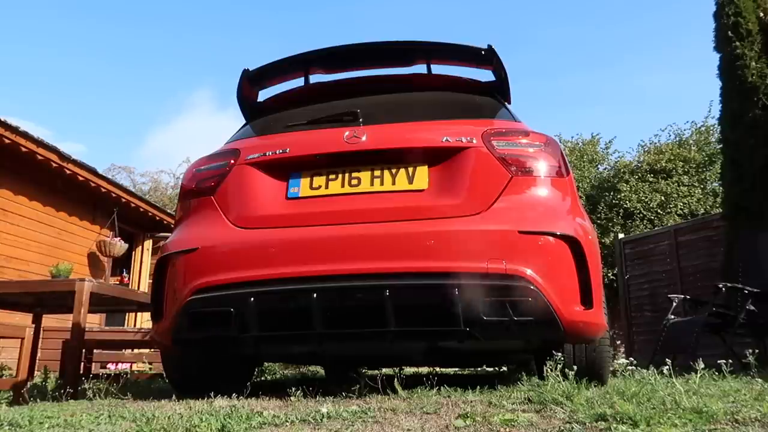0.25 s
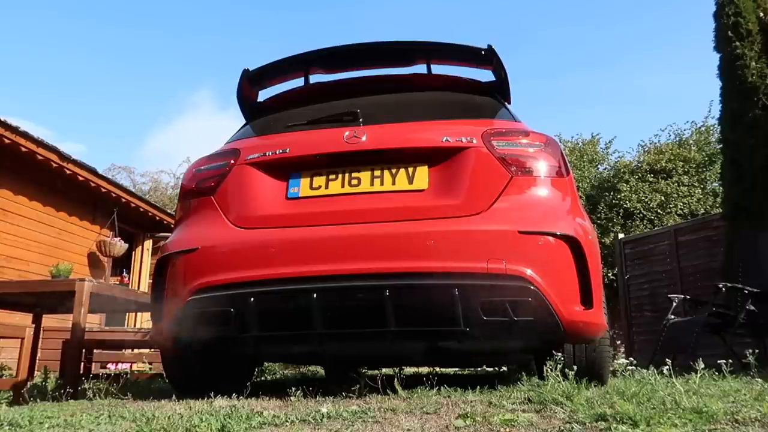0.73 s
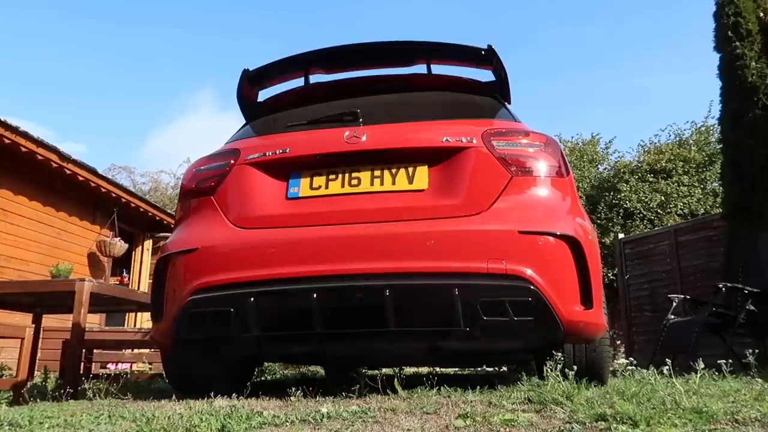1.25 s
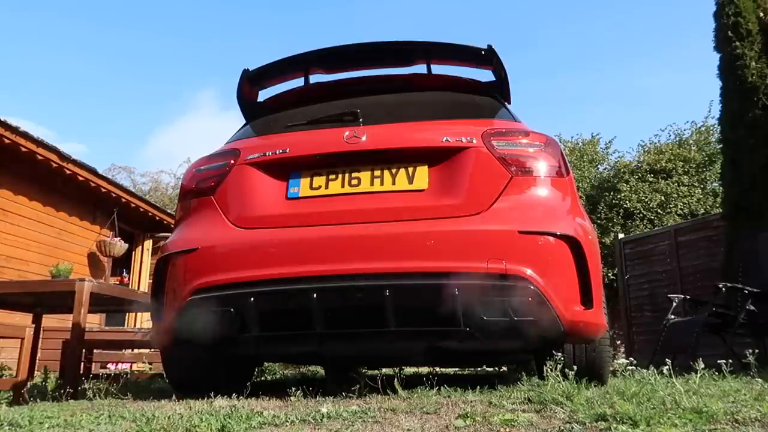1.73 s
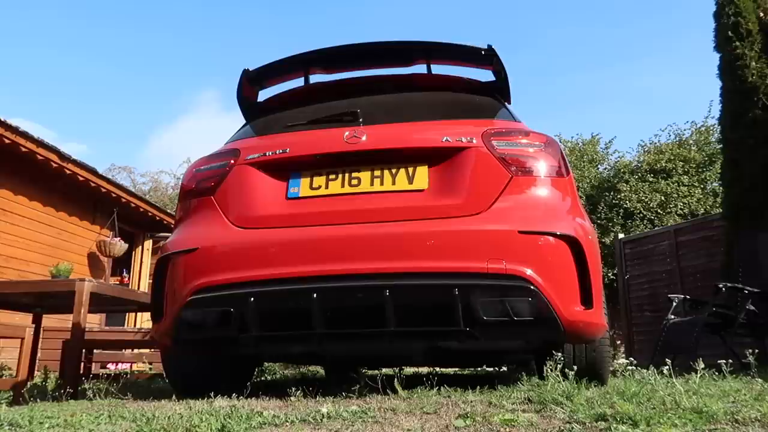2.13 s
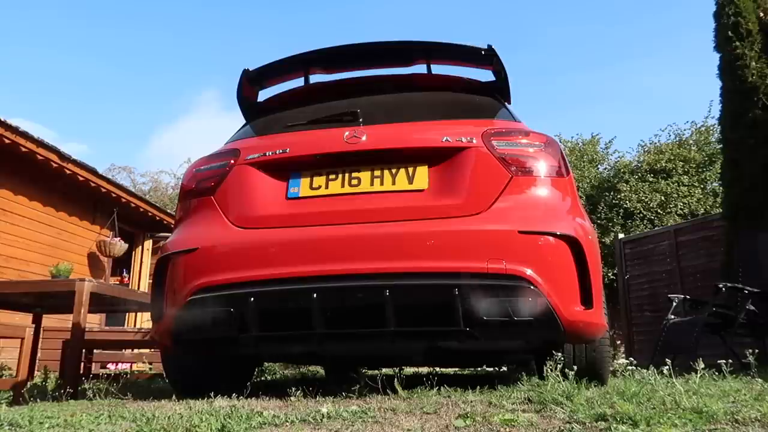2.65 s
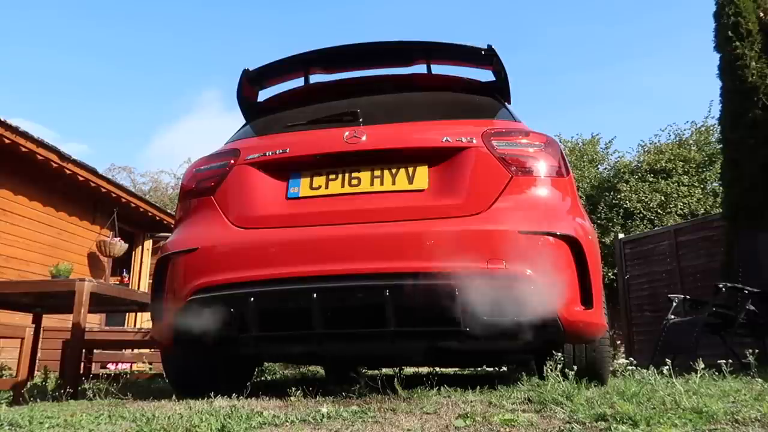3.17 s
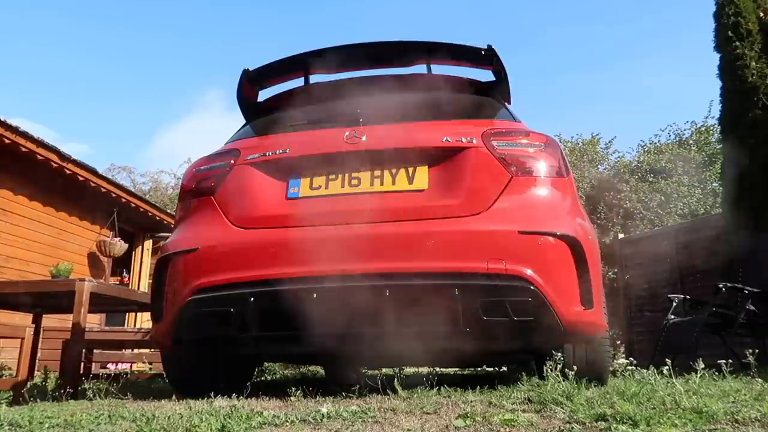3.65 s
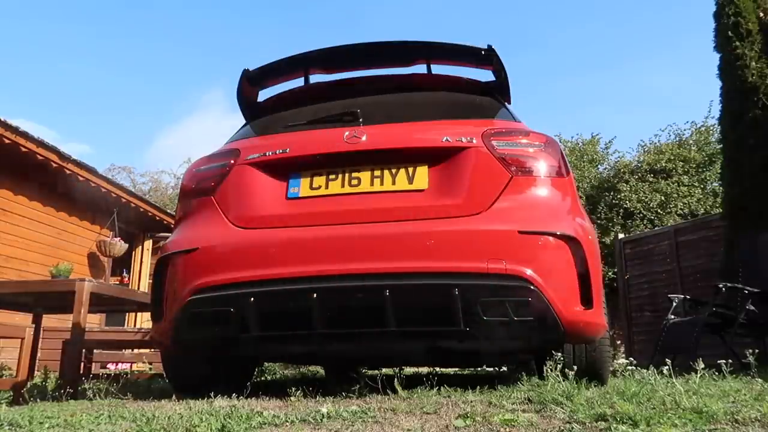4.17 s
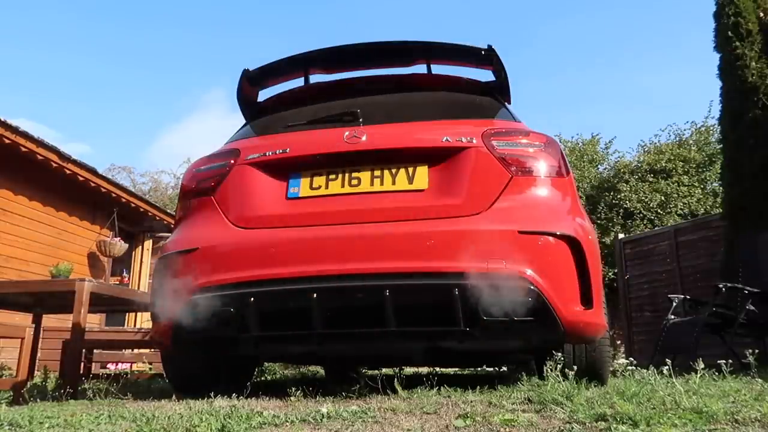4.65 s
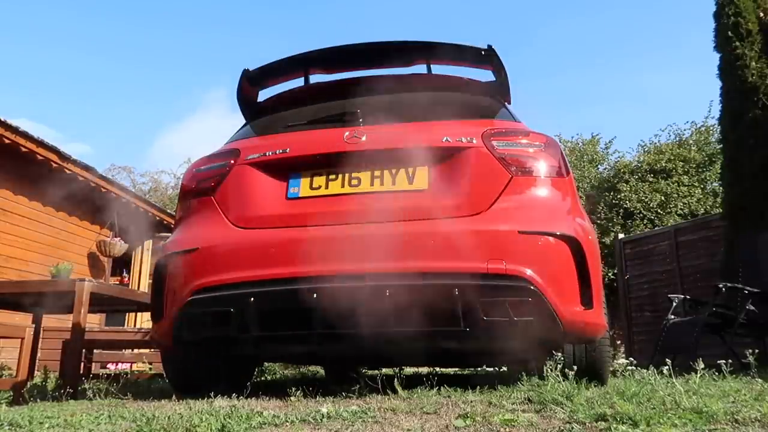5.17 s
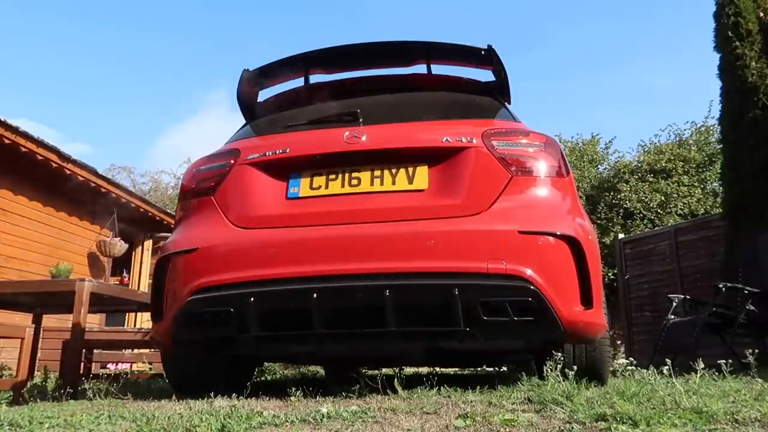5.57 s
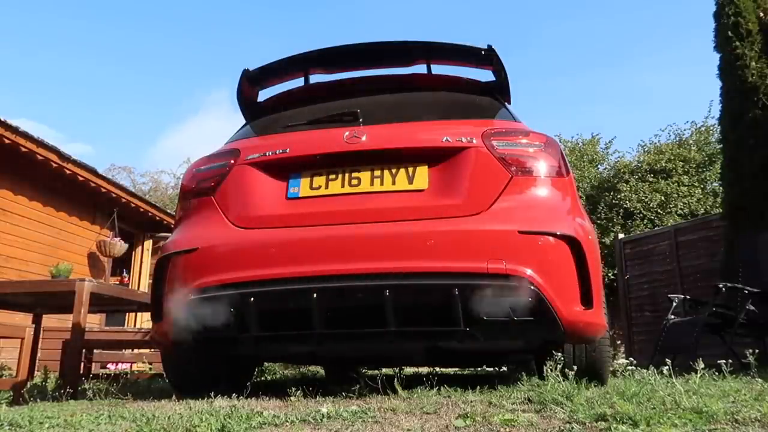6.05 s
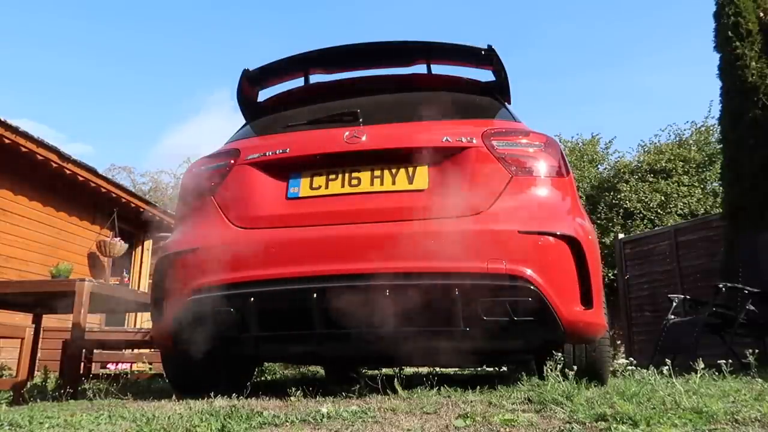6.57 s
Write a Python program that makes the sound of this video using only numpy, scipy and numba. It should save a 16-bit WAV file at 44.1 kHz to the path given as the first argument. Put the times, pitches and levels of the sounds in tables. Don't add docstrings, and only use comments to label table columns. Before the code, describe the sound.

Low outdoor microphone right behind the tail pipes: deep uneven idle puffs with faint fan hiss, then three throttle blips. Each climbs quickly in pitch with a hollow silencer bark and gritty rasp, cuts off, and coasts down in a droning hum. Popping unburnt fuel crackles after the first, bangs loudest after the second, and snaps a few times after the third. Close, almost dry, with very slight garden scatter.

```python
import sys
import numpy as np
from scipy import signal
from scipy.fft import rfft, irfft, next_fast_len
from scipy.io import wavfile
from scipy.ndimage import uniform_filter1d
from numba import njit

SR = 44100
rng = np.random.default_rng(int(sys.argv[2]) if len(sys.argv) > 2 else 0)


def volts_from_db(level):
    exponent = np.asarray(level, float) / 20
    return 10 ** exponent


def wav_record(signal):
    frames = np.transpose(np.atleast_2d(signal))
    bounded = np.clip(frames, -1, 1)
    quanta = np.round(bounded * 32767).astype(np.int16)
    wavfile.write(sys.argv[1], SR, quanta)


N = 300274

# (t/s, firing rate f/Hz)
SPEED = [(0, 48.16), (.45, 34.68), (.53, 34.96), (.89, 92.45), (1.07, 129.2), (1.55, 115), (3.17, 54.48),
         (3.3, 67.8), (3.57, 120.1), (3.86, 181.6), (3.96, 180.5), (4.59, 149.3), (4.98, 136.6),
         (5.1, 149.1), (5.31, 195.6), (5.46, 201.7), (6.33, 151.5), (6.81, 133.5)]
# (fuel on t/s, fuel off t/s, first order level/dB, second level/dB, third level/dB)
BURNS = [
    (-.1, 0.295, -35.5, -15.5, -29.5),
    (0.279, 0.4, -18, -16, -23),
    (0.476, 0.565, -24, -18, -19.5),
    (0.486, 1.145, -15.5, -19.5, -24.5),
    (3.186, 3.868, -15.5, -19.5, -25.5),
    (4.985, 5.337, -22.5, -27.5, -27.5),
    (6.46, 6.9, -27.5, -37, -41),
]
# (t/s, gas level/dB)
EFFORT = [
    [(.46, -59), (.56, -42), (.83, -39.5), (.9, -32.5), (1.02, -35.5), (1.14, -31), (1.2, -58)],
    [(3.16, -62), (3.29, -40.5), (3.47, -32), (3.68, -34), (3.79, -27), (3.9, -25.5), (3.965, -28),
     (4.02, -57.5)],
    [(4.96, -65.5), (5.02, -43), (5.2, -39), (5.31, -29.5), (5.37, -23.5), (5.46, -29), (5.53, -61)],
]
# (t/s, hum level/dB, gas level/dB)
COAST = [(0, -30, -49), (0.449, -21.5, -53), (1.191, -26.5, -51), (1.399, -16, -52.5), (1.579, -20, -47),
         (1.74, -26.5, -51.5), (2.33, -28, -58), (3.1, -19.5, -53.5), (4.0, -21, -50),
         (4.201, -14.5, -47.5), (4.261, -29.5, -59), (4.75, -25.5, -57), (4.95, -27, -56),
         (5.5, -24, -46.5), (5.899, -19.5, -51), (6.18, -24.5, -52), (6.36, -22.5, -51), (6.81, -18, -48.5)]
COAST_ORDERS = [-24, -30]
UPPER_ORDERS = [-1, -6.5]
# (f/Hz, width/Hz,
# level/dB)
NULLS = [(53, 3, -14.5), (81.2, 8.7, -10.5), (111, 39, 2.5), (205, 7.9, -16), (367.7, 29.6, -12.5)]
CYLINDERS = [-0.42, -0.73, -0.58, -1.1]
# (f/Hz, width/Hz, level/dB)
SILENCER = [(73, 15, -12.5), (108, 14, -12.5), (179.3, 13, 2), (241, 33.5, 1.5), (272.7, 16, -10),
            (485.4, 43, 2.5), (611, 9.8, -5), (762, 32, -7), (931, 22, -5), (1230, 420, -24)]
# (f/Hz, width/Hz, level/dB)
MOUTH = [(1345, 20, 12.5), (1565, 13, -15.5), (1770, 74, 6), (1860, 720, 6.5), (2130, 420, 1.5),
         (2414, 73, 8), (2410, 58, 6.5), (2000, 290, -1)]
# (f/Hz, width/Hz, level/dB)
EDGE = [(3000, 300, 0.5), (3660, 340, -4.5), (4240, 810, -13.5), (6400, 3600, -11.5)]
# (f/Hz, width/Hz, level/dB)
FLARE = [(3030, 660, 5.5), (3720, 170, -10.5)]
# (f/Hz, width/Hz, level/dB)
FAN_AIR = [(3400, 1200, 5.5), (5050, 1000, -12.5), (6700, 1400, -15.5), (9500, 2500, -10)]
# (t/s, thump level/dB, depth level/dB, brightness level/dB)
LUMPS = [(0.113, -20.5, -7.5, -7), (0.188, -12.5, -3.5, -22), (0.246, -9, -5, -38),
         (0.286, -14, 1.5, -15.5), (0.31, -11.5, -1.5, -14), (0.342, -11.5, 7, -18),
         (0.364, -14, 5.5, -28.5), (0.474, -17, 7.5, -32)]
# (t/s, thump level/dB, depth level/dB, brightness level/dB)
PUFFS = [(1.169, -12, 2, -2), (1.209, -14, -6.5, -4.5), (1.299, -25, 5, -1.5), (3.893, -13.5, -10, 3.5),
         (4.052, -27.5, 7, -5), (4.128, -19.5, -0.5, -0.5), (4.859, -27.5, -9, 0), (4.89, -44, 1, 14),
         (5.326, -13.5, -7.5, -8), (5.488, -13, -2.5, -14), (5.544, -8.5, -14, -7), (5.568, -14, -6.5, -2),
         (5.881, -25.5, 11.5, -4.5), (6.358, -23.5, -5, -2), (6.372, -24.5, -1.5, 6),
         (6.389, -20.5, -0.5, -13.5)]
# (t/s, crack level/dB, thump level/dB, sizzle level/dB, crack centre f/Hz)
POPS = [(1.47, -10.5, -7.5, -47, 2100), (1.512, -10.5, -19, -47, 1800), (1.6104, -11, -8, -42, 1800),
        (1.6748, -7.5, -13, -30.5, 2270), (1.7697, -10, -12, -36.5, 1980), (1.787, -15.5, -15.5, -49, 2070),
        (1.8364, -23, -24.5, -71, 1950), (1.8679, -9, -13, -33, 1687), (1.929, -13, -15.5, -44.5, 2410),
        (3.874, -15, -26.5, -45.5, 2120), (3.8967, -14, -26.5, -42, 2100),
        (3.9126, -14, -25.5, -43.5, 2320), (4.2163, -4.5, -4, -18.5, 3000), (5.5228, -19, -11.5, -77, 1987),
        (5.695, -10.5, -3.5, -46.5, 1700), (5.8217, -8, -9, -32.5, 1940)]
# (f/Hz, width/Hz, level/dB)
SHOCK = [(720, 910, -4.5), (1800, 67, 16.5), (2500, 290, 6), (2960, 1200, -31.5)]
# (f/Hz, width/Hz, level/dB)
SIZZLE = [(4430, 720, 2.5), (6050, 1900, 7), (10200, 2500, -7.5), (13500, 1700, -23.5)]
# (f/Hz, left minus right level/dB, left lead/rad)
PORTS = [(40, 0, .008), (250, .1, .035), (600, .7, .07), (1200, 1.4, .1), (2400, 1, .18), (4500, 1.5, .65),
         (8000, 1.2, 1.35), (15000, 1.4, 1.3)]

ECHO_S, ECHO_DB = 0.0066, -6


@njit
def svf(x, hz, width):
    band, high, b, l = np.empty(len(x)), np.empty(len(x)), 0., 0.
    for i in range(len(x)):
        g, k = np.tan(np.pi * hz[i] / SR), width[i] / hz[i]
        v = (b + g * (x[i] - l)) / (1 + g * (g + k))
        low = l + g * v
        b, l = 2 * v - b, 2 * low - l
        band[i], high[i] = k * v, x[i] - k * v - low
    return band, high


def lowpass(x, hz, order):
    return signal.sosfilt(signal.butter(order, hz, fs=SR, output="sos"), x)


def ring(x, modes):
    return sum(volts_from_db(db) * signal.lfilter(*signal.iirpeak(hz, hz / width, fs=SR), x) for hz, width, db in modes)


def delay(x, lag):
    return np.r_[np.zeros(lag), x][:len(x)]


def echo(x):
    for trips in (1, 2, 4):
        x = x + delay(x, int(ECHO_S * SR) * trips) * volts_from_db(ECHO_DB * trips)
    return x


def smooth(x, span):
    return uniform_filter1d(uniform_filter1d(x, span), span)


def even(x, lo_hz, hi_hz):
    inside = signal.sosfilt(signal.butter(2, [lo_hz, hi_hz], "bandpass", fs=SR, output="sos"), x)
    return x / np.sqrt(smooth(inside ** 2, SR // 8) + 1e-18)


def unit(x):
    return x / np.max(np.abs(x))


def louder(*dbs):
    return 10 * np.log10(sum(volts_from_db(db) ** 2 for db in dbs))


def order_levels(t, hz, hum_db):
    orders = []
    for k, under_db in enumerate([0, *COAST_ORDERS]):
        burn, order_hz = 0, (k + 1) * hz
        for row in BURNS:
            light, cut = (t - row[0]) / .04, 1 - (t - row[1]) / 0.063
            burn = burn + volts_from_db(row[2 + k]) * np.clip(np.minimum(light, cut), 0, 1)
        burn_db = 20 * np.log10(burn + 1e-9)
        null_db = sum(db * np.exp(-((order_hz - at) / width) ** 2) for at, width, db in NULLS)
        if k:
            flutter = smooth(rng.standard_normal(N), int(.04 * SR))
            flutter_db = 2.5 * flutter / flutter.std()
            resonance_db = 17.6 * np.exp(-((order_hz - 100) / 25) ** 2)
            under_db = under_db + 0.23 * (hum_db + 22.5) + flutter_db + resonance_db
        orders.append(louder(burn_db + null_db, hum_db + under_db))
    for k, db in enumerate(UPPER_ORDERS):
        resonance_db = -9 * (((k + 4) * hz - 540) / 130) ** 2
        orders.append(burn_db + db + np.roll(flutter_db, (k + 1) * SR) + resonance_db)
    return orders


def controls():
    t = np.arange(N) / SR
    flywheel_s = .03
    hz = uniform_filter1d(np.interp(t, *np.transpose(SPEED)), int(flywheel_s * SR), mode="nearest")
    s, hum_db, gas_db = np.transpose(COAST)
    hum_db, gas_db = np.interp(t, s, hum_db), np.interp(t, s, gas_db)
    orders = order_levels(t, hz, hum_db)
    blips = [np.interp(t, *np.transpose(blip), left=-120, right=-120) for blip in EFFORT]
    effort_db = np.max(blips, axis=0)
    over_db, octaves = effort_db + 35, np.log2(hz / 120)
    orders[3:] = [db + .6 * np.minimum(over_db, 0) for db in orders[3:]]
    bark_db = louder(-32.5 + np.where(over_db > -20, 0.61 * over_db, over_db), gas_db + 5)
    rasp_db = louder(effort_db, gas_db)
    hiss_db = louder(-60 + 0.61 * over_db, gas_db - 14.5 + 11 * octaves)
    flare_db = -58 + 1.76 * over_db
    shut = np.clip((gas_db - effort_db) / 10, 0, 1)
    chest_db = 13.5 - 7.5 * np.maximum(octaves, 0) + 5.5 * np.maximum(-octaves, 0) * shut
    return hz, orders, bark_db, rasp_db, hiss_db, flare_db, chest_db


def firings(hz, turns, cycle, chance, throttle, flip):
    fired = np.flatnonzero(np.diff(cycle)) + 1
    late = (turns[fired] - cycle[fired]) * SR / hz[fired]
    uneven = 1 + (1.1 - throttle[fired]) * np.array(CYLINDERS)[cycle[fired] % 4]
    sign = np.sign(flip[fired] - np.pi / 2)
    pulses = np.zeros((2, N + 1))
    for row, spread_db in enumerate((1.6, 4.)):
        size = sign * uneven * volts_from_db(spread_db * np.clip(chance[cycle[fired], row], -2, 2))
        pulses[row, fired] = -size * late
        pulses[row, fired + 1] = -size * (1 - late)
    return pulses[:, :N]


def hum(hz, turns, flip, orders, bark_db):
    first_db, second_db, third_db, *upper_db = orders
    third_db = np.where(3 * hz > 400, np.minimum(third_db, bark_db + 4), third_db)
    levels = enumerate((first_db, second_db, third_db, *upper_db))
    return np.sqrt(2) * sum(volts_from_db(db) * np.cos((k + 1) * 2 * np.pi * turns + flip) for k, db in levels)


def silencer_burble(bark_db):
    burble = lowpass(ring(rng.standard_normal(N), SILENCER[:2]), 180, order=2)
    return volts_from_db(-49 + .5 * (bark_db + 51.5)) * even(burble, 40, 100)


def silencer_bark(puffs, hz, throttle, bark_db, chest_db):
    rush = .6 * (1.32 - throttle) * np.sqrt(hz / SR)
    flow = lowpass(puffs, 730, order=1) + rush * rng.standard_normal(N)
    chest = lowpass(ring(flow, SILENCER[:5]), 316, order=8)
    bark = lowpass(ring(flow, SILENCER[5:]), 1350, order=4) + volts_from_db(chest_db - 7.5) * chest
    for order in (1, 2, 3):
        bark = bark - svf(bark, order * hz, .15 * hz)[0]
    bark = svf(bark, 1.1 * hz, 1.4 * hz)[1]
    return volts_from_db(bark_db) * even(bark, 433, 700)


def pipe_mouth(puffs, hz, turns, cycle, chance, throttle, rasp_db, hiss_db, flare_db):
    gate = 0.91 + throttle * np.exp(-(turns - cycle) / 0.12)
    patchy_db = 3 * throttle * uniform_filter1d(chance[:, 1], size=2)[cycle]
    gas = gate * volts_from_db(patchy_db) * rng.standard_normal((2, N))
    snap = np.clip((rasp_db + 40) / 16, 0, 1)
    snaps, sharp_snaps = snap * puffs, snap ** 5 * puffs
    rasp = lowpass(echo(ring(snaps + 0.07 * gas[0], MOUTH)), 2122, order=6)
    hiss = lowpass(ring(.5 * sharp_snaps + 0.06 * gas[1], EDGE), 5800, order=4)
    flare = lowpass(echo(ring(snaps + 0.14 * gas[1], FLARE)), 4000, order=6)
    fronts = sharp_snaps * volts_from_db(-4.5 * (cycle % 2)) / np.sqrt(hz / SR)
    spikes = svf(lowpass(fronts, 2890, order=7), np.full(N, 450.), np.full(N, 640.))[1]
    return (volts_from_db(rasp_db) * even(rasp, 800, 3400) + volts_from_db(flare_db) * even(flare, 2100, 4600)
            + volts_from_db(-13.5) * spikes + volts_from_db(hiss_db) * even(hiss, 2800, 12000))


def engine():
    hz, orders, bark_db, rasp_db, hiss_db, flare_db, chest_db = controls()
    turns = np.cumsum(hz) / SR + .45
    cycle = turns.astype(int)
    chance = rng.standard_normal((cycle[-1] + 1, 2))
    throttle = np.clip((bark_db + 49) / 12, 0, 1)
    flip = np.pi * np.clip((hz - 82) / 24, 0, 1)
    puffs = firings(hz, turns, cycle, chance, throttle, flip)
    mouth = pipe_mouth(puffs[1], hz, turns, cycle, chance, throttle, rasp_db, hiss_db, flare_db)
    return (hum(hz, turns, flip, orders, bark_db) + silencer_burble(bark_db)
            + silencer_bark(puffs[0], hz, throttle, bark_db, chest_db) + mouth)


def air():
    hiss = lowpass(ring(rng.standard_normal(N), FAN_AIR), 9700, order=4)
    s, _, gas_db = np.transpose(COAST)
    return volts_from_db(-68 + np.interp(np.arange(N) / SR, s, gas_db + 53.5)) * even(hiss, 3200, 12000)


def thump(length, depth_db, bright_db, push_s, fade_s):
    t = np.arange(length) / SR
    push = (1 - np.exp(-t / 0.00094)) * np.exp(-t / push_s)
    push = -lowpass(push * (1 + .5 * rng.standard_normal(length)), 900, order=2)
    chest = lowpass(ring(push, SILENCER[2:5]), 320, order=6)
    deep, bright = ring(push, SILENCER[:2]), ring(push, SILENCER[5:])
    body = unit(chest) + volts_from_db(depth_db) * unit(deep) + volts_from_db(bright_db) * unit(bright)
    return body * np.exp(-t / fade_s)


def lumps_and_puffs():
    out, length = np.zeros(N + SR), SR // 4
    for s, thump_db, depth_db, bright_db in [*LUMPS, *PUFFS]:
        i = int(s * SR)
        out[i:i + length] += volts_from_db(thump_db - 3.5) * thump(length, depth_db, bright_db, 0.00072, 0.14)
    return out[:N]


def pops():
    out, length = np.zeros(N + SR), SR // 4
    t = np.arange(length) / SR
    lag = int(ECHO_S * SR)
    for s, crack_db, thump_db, sizzle_db, centre_hz in POPS:
        noise = rng.standard_normal((2, length))
        first = np.exp((.0007 - t) / .0006) * (t > .0007)
        shock = first + volts_from_db(-3) * delay(np.exp(-t / .0007), lag + SR // 1000)
        tail = np.clip(t / 0.0036, 0, 1) * volts_from_db(-20) * np.exp(-t / 0.015)
        modes = [(hz * centre_hz / 1950, width * (centre_hz / 1700) ** 2, db) for hz, width, db in SHOCK]
        modes.append((centre_hz, 600, 8))
        crack = ring(shock * (.5 * noise[0] - 1), modes) + ring(tail * noise[0], MOUTH + modes)
        crack = unit(lowpass(crack, 1500 + centre_hz, order=5))
        spray = (shock ** 2 + 1.2 * tail * np.exp(-t / 0.057)) * noise[1]
        sizzle = unit(lowpass(ring(spray, SIZZLE), 14000, order=4))
        push = thump(length, 1.5, 2, .0016, .035)
        push = push + volts_from_db(-14.5) * delay(push, lag)
        i = int(s * SR)
        out[i:i + length] += volts_from_db(crack_db + 5) * crack + volts_from_db(sizzle_db + 17) * sizzle
        out[i:i + length] += volts_from_db(thump_db - 5.5) * push
    return out[:N]


def duck():
    t, db = np.arange(N) / SR, 0
    for s, crack_db, *_ in POPS:
        since = np.maximum(t - s - .002, 0)
        drop_db = max(crack_db + 14, 0) * 0.25
        db = db - drop_db * (1 - np.exp(-since / 0.0011)) * np.exp(-since / 0.048)
    return volts_from_db(db)


def scene():
    car = (engine() + air()) * duck() + lumps_and_puffs() + pops()
    t = np.arange(SR // 8) / SR
    tail = rng.standard_normal(len(t)) * np.exp(-t / 0.024)
    bright = ring(car, [(3000, 4100, 0.0022), (9000, 6000, 0.0083)])
    wide = signal.fftconvolve(bright, tail / np.linalg.norm(tail))[:N]
    return car + volts_from_db(-27) * wide * np.array([[1], [-1]])


def top_cut(x):
    return signal.sosfilt(signal.butter(12, 15590, fs=SR, output="sos"), x)


def record(dry):
    size = next_fast_len(N)
    hz, gain_db, lead = np.transpose(PORTS)
    at, knots = np.log(np.fft.rfftfreq(size, 1 / SR) + 1), np.log(hz)
    half = volts_from_db(np.interp(at, knots, gain_db) / 2) * np.exp(.5j * np.interp(at, knots, lead))
    ports = irfft(rfft(dry, size) * np.array([half, 1 / half]), size)[:, :N]
    return top_cut(1.71 * np.tanh(ports / 1.568))


dry = scene()
out = record(dry)
wav_record(out)
```